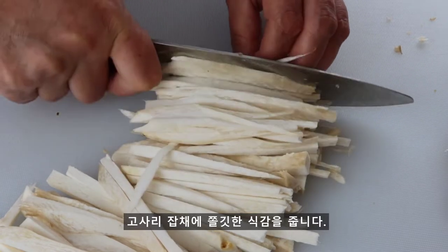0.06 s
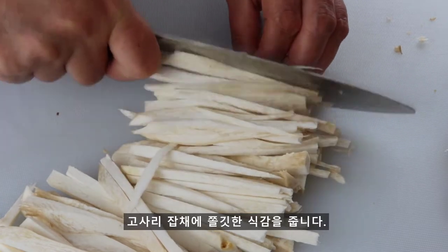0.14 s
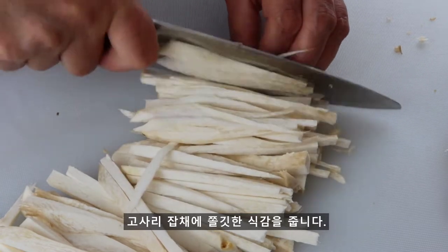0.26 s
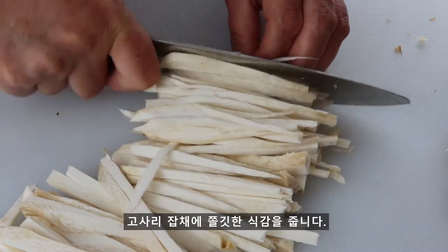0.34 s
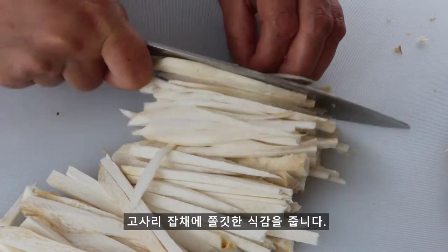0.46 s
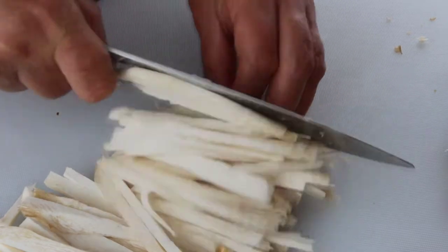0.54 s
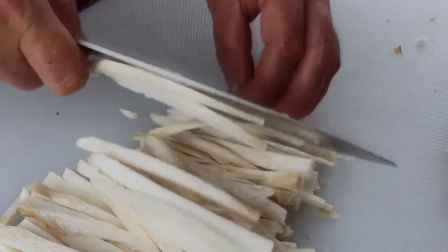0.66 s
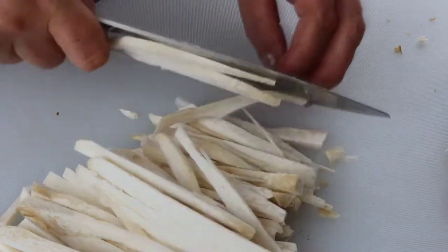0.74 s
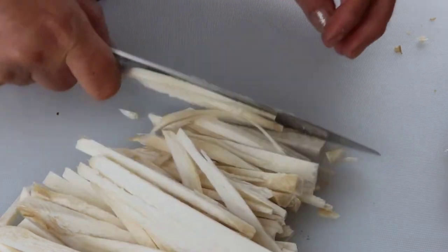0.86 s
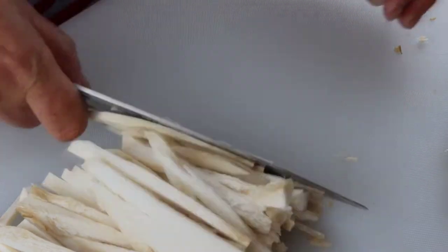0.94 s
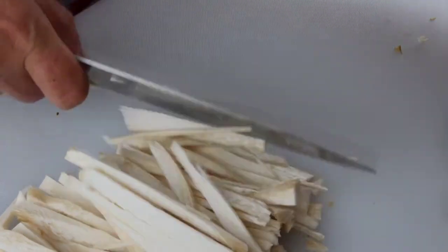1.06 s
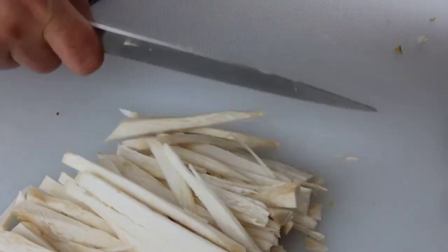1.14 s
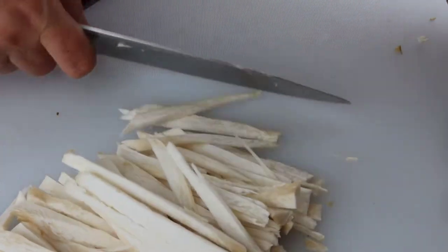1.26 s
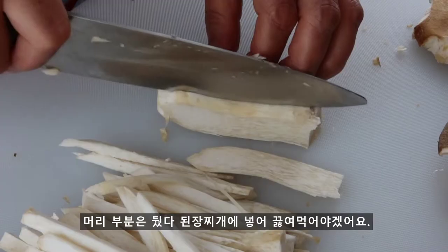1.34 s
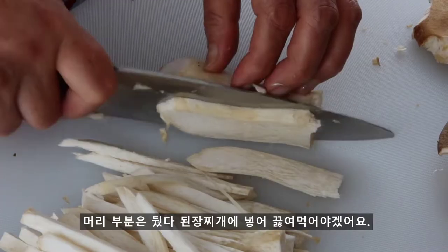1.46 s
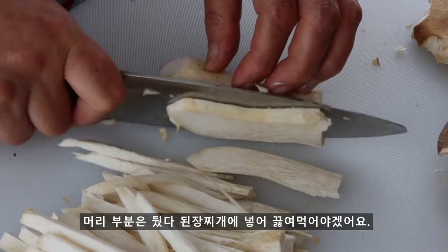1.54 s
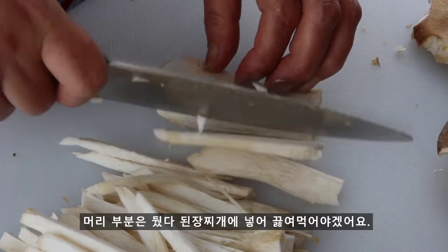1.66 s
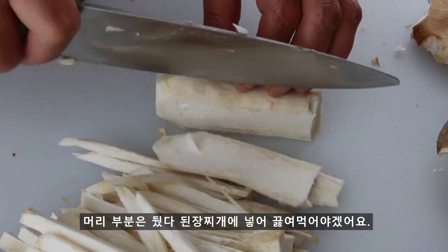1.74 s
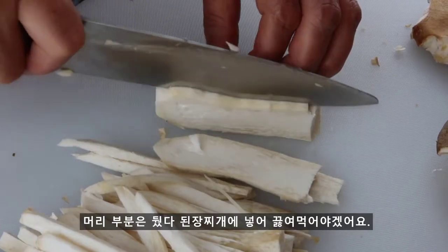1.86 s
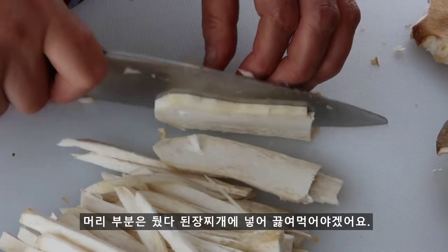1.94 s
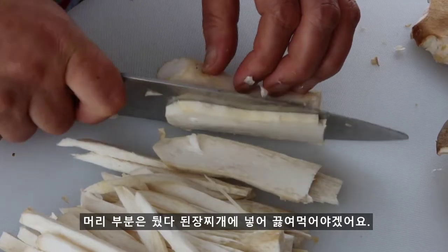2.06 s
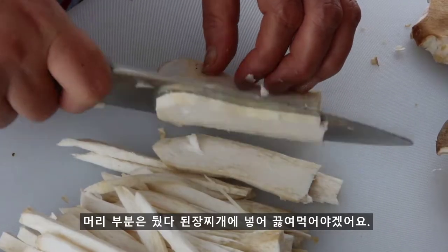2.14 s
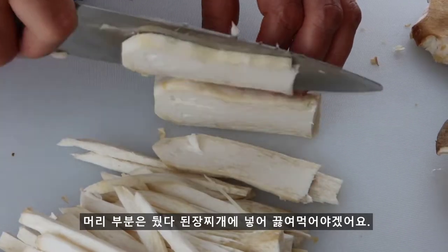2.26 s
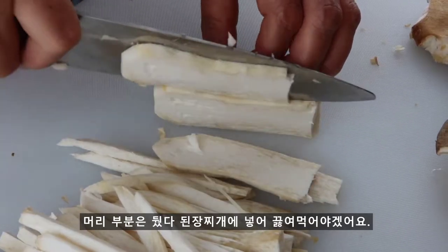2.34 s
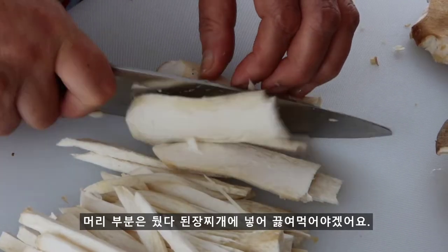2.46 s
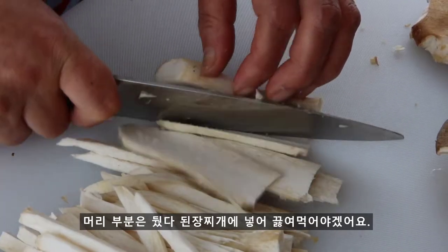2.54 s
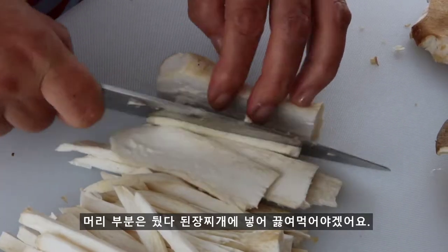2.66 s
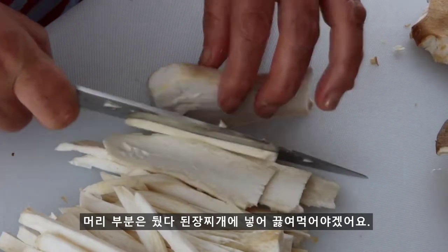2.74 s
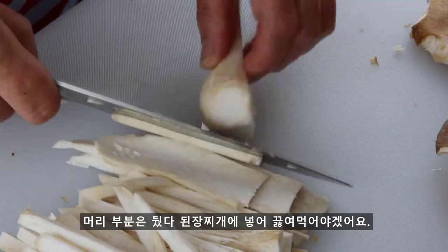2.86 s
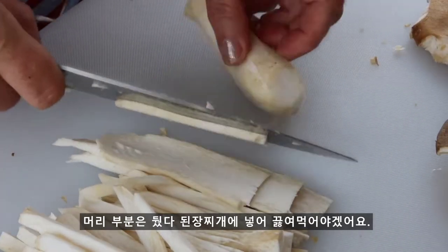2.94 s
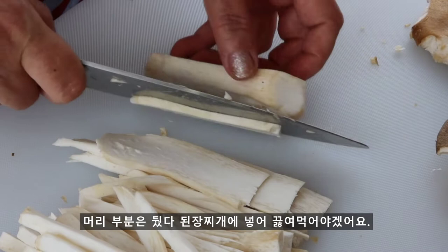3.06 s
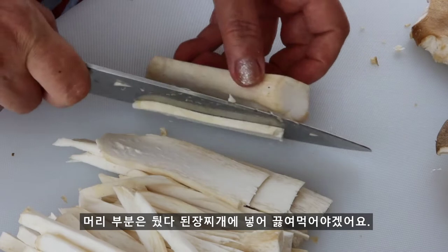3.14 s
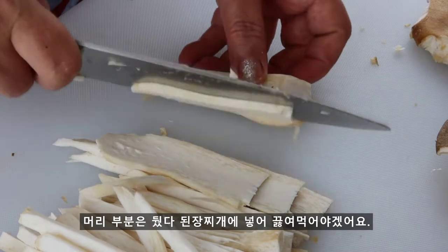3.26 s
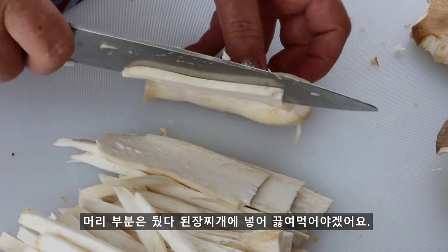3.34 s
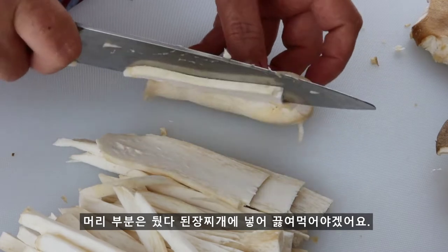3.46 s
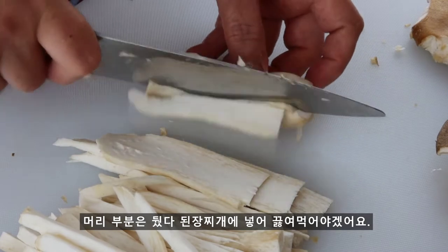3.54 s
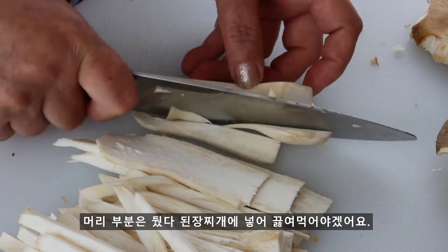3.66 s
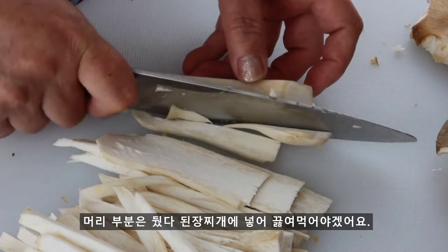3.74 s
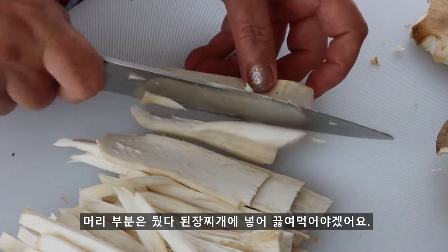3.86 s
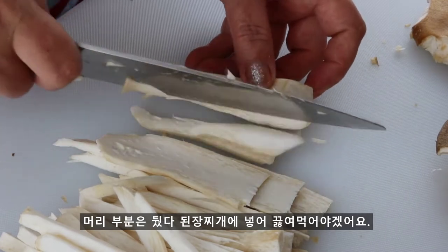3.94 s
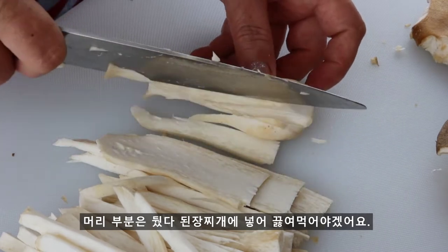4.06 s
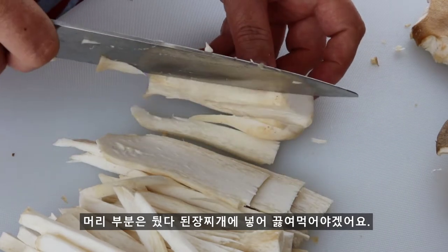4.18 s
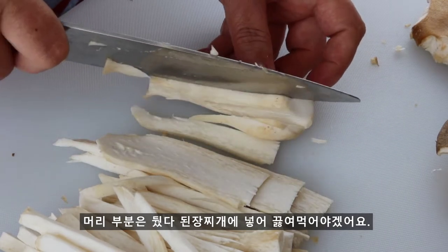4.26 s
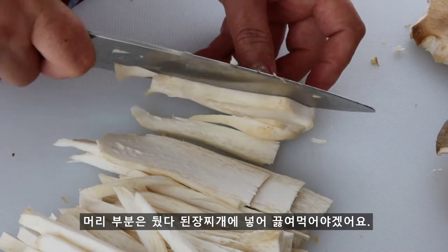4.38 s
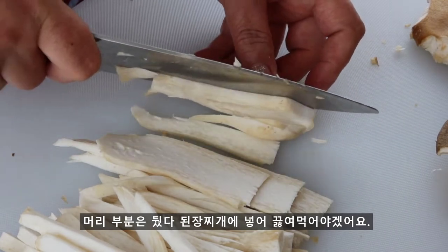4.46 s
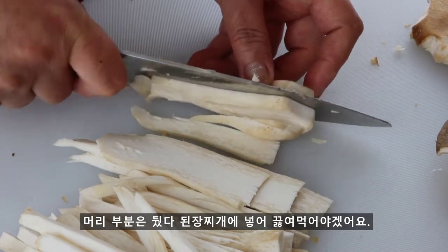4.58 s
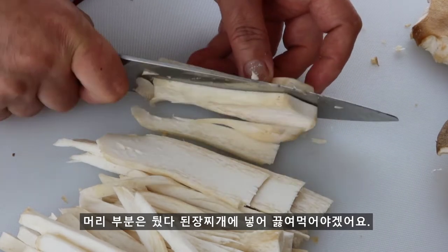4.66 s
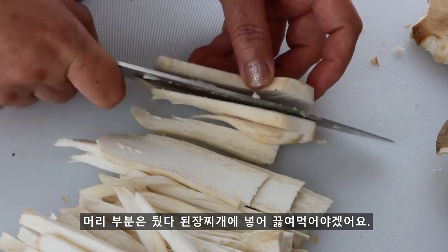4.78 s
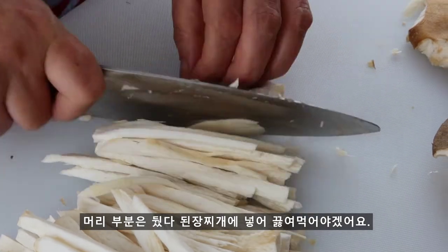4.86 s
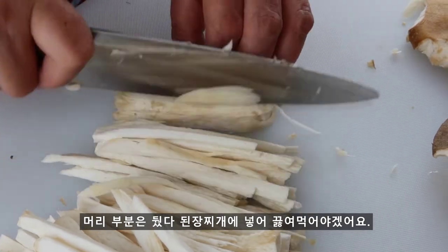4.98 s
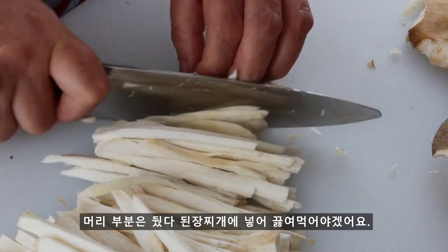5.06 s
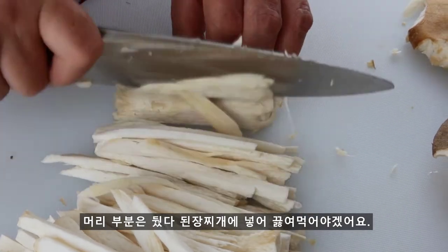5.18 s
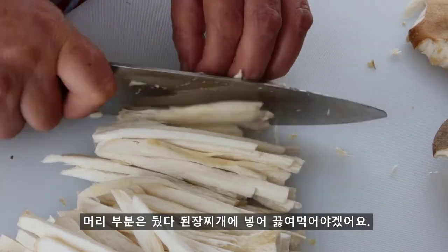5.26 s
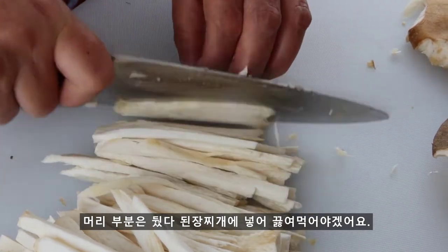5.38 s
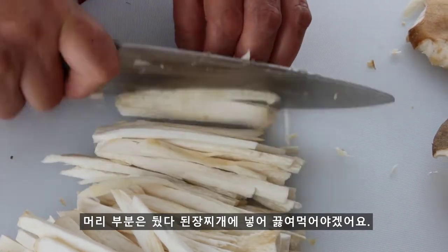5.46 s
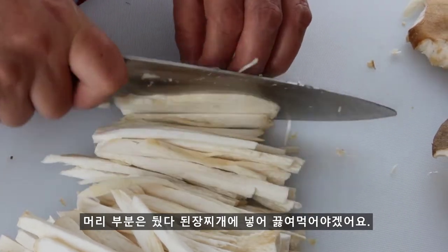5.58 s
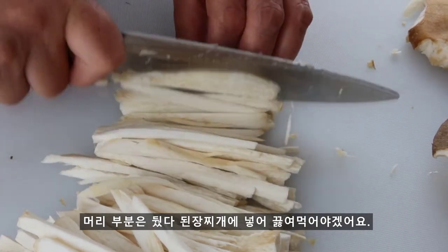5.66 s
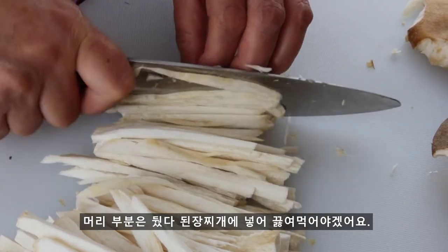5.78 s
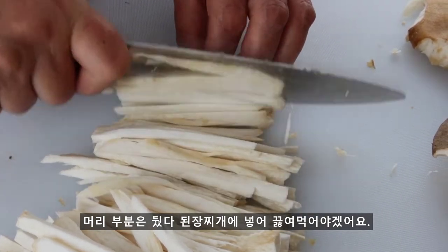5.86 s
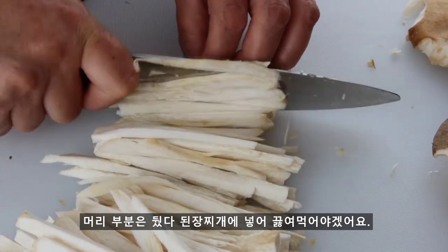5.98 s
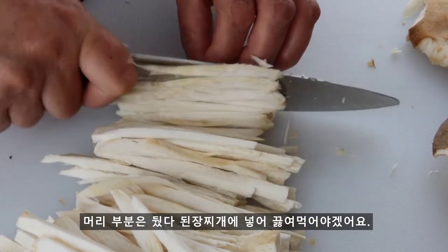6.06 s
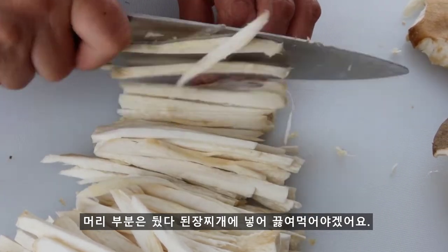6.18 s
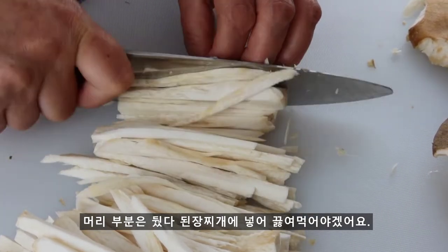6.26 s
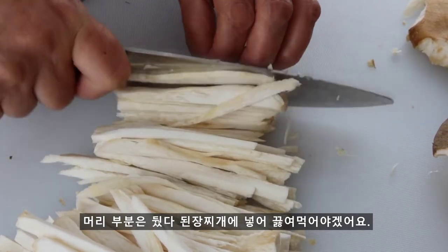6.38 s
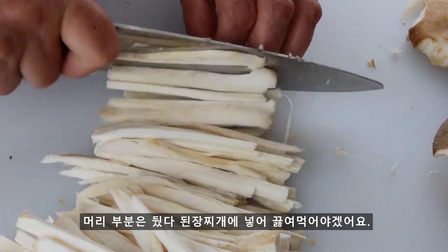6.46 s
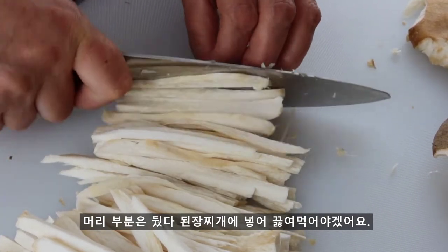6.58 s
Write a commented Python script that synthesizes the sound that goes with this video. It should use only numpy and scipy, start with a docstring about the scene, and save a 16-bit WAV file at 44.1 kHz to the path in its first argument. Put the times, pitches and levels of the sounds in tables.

```python
"""A chef's knife slices mushroom stems on a plastic board, close to the microphones in a small kitchen.
Five strokes open at an uneven pace: the edge knocks on the board and judders, mostly after a crackle of fibres.
Two hard, far brighter knocks follow between 2.5 and 4 s, with drags, soft bumps and a thin singing of the blade.
From 4.7 s the strokes come quicker; scrapes, taps and rustling slices are scattered among them throughout.
Modes ring for board and blade, random slips drive them; short echoes and soft hiss lie behind, peaks flatten."""
import sys
import numpy as np
from scipy import signal
from scipy.fft import rfft, irfft, next_fast_len
from scipy.io import wavfile

SR = 44100
rng = np.random.default_rng(int(sys.argv[2]) if len(sys.argv) > 2 else 0)


def int16_out(signal):
    """Quantize to a 16-bit WAV file."""
    q = np.round(np.clip(np.atleast_2d(signal).T, -1, 1) * 32767)
    wavfile.write(sys.argv[1], SR, q.astype(np.int16))


N = 291501  # samples


def undb(db):
    """Decibels to gain."""
    return 10 ** (np.asarray(db) / 20)


def level(x, db):
    """Scale to an rms level."""
    return x * undb(db) / np.sqrt(np.mean(x ** 2))


def burst(x, length, db):
    """Scale a burst so that its energy, spread over the given length, has this rms level."""
    return x * undb(db) * np.sqrt(length * SR / np.sum(x ** 2))


def add(track, s, x):
    """Mix a sound in at a time in seconds."""
    i = max(int(s * SR), 0)
    track[i:i + len(x)] += x[:N - i]


def along(points, hz):
    """Read (Hz, value) points on a log-frequency axis."""
    f, value = np.transpose(points)
    return np.interp(np.log(np.maximum(hz, 1)), np.log(f), value)


def colour(x, points):
    """Filter a sound by a curve of (Hz, dB) points."""
    size = next_fast_len(len(x) + 512)
    gain = undb(along(points, np.fft.rfftfreq(size, 1 / SR)))
    return irfft(rfft(x, size) * gain, size)[:len(x)]


def decay(t, t60):
    """Exponential fall by 60 dB in t60 seconds."""
    return np.exp(-np.log(1000) * t / t60)


def soften(x, hz):
    """A yielding contact takes the treble off: three equal smoothing poles."""
    pole = np.exp(-2 * np.pi * hz / SR)
    return signal.lfilter([(1 - pole) ** 3], np.poly([pole, pole, pole]), x)


def ring(modes, change_db=0, detune=0, hold=1, in_step_hz=1300):
    """Modes after one push: low ones start in step, high ones and the exact pitch depend on where it lands."""
    hz, db, t60 = np.transpose(modes)
    pitch, phase = rng.standard_normal((len(hz), 2)).T
    t = np.arange(int(np.max(t60 * hold) * SR))[:, None] / SR
    waves = np.cos(2 * np.pi * hz * (1 + detune * pitch) * t + phase * (hz / in_step_hz) ** 2)
    return (waves * decay(t, t60 * hold)) @ undb(db + change_db)


def slips(length, rate, spread_db, fade_s=0.00088):
    """A burst of tiny pushes, uneven in size and either sign, at random moments."""
    size = max(int(length * SR), 16)
    push = np.zeros(size)
    own_rng = np.random.default_rng(rng.integers(2 ** 31))
    moment, strength, sign = own_rng.random((int(length * rate) + 2, 3)).T
    # a few pushes are much stronger than the rest
    sizes = undb(-abs(spread_db) * np.log(.02 + strength)) * np.sign(sign - .5)
    np.add.at(push, (moment * size).astype(int), sizes)
    return push * signal.windows.tukey(size + 2, min(2 * fade_s / length, 1))[1:-1]


# strokes: the edge lands on the board, mostly at the end of a cut, twice with next to none:
# (landing t/s, level/dB over 10 ms, contact hardness f/Hz, edge tick level/dB re landing before colouring,
# cut length t/s, tearing level/dB, judder level/dB re landing)
STROKES = [ (0.105, -20.5, 1087, -32, 0.018, -55, -3), (.4220, -18.5, 1057, -13, 0.019, -55, -28),
           (.969, -23, 1510, -6.5, 0.0035, -60, -15), (1.6022, -12.5, 980, -16, 0.1, -53.5, -17),
           (2.1059, -18, 900, -5.5, .1, -52.5, -9), (2.5650, -5.5, 6695, 2.5, .017, -36.5, -38.5),
           (3.7242, -5, 2320, -9.5, 0.0244, -37, -22), (4.697, -16, 762, -20.5, 0.085, -48, -11.5),
           (4.9045, -22.5, 1050, -6, 0.0066, -60, 0), (5.1713, -8.5, 2100, -18.5, .035, -43.5, -28),
           (5.4060, -15, 1350, -18, .053, -45, -12.5), (5.649, -21.5, 444, -27, 0.063, -45.5, -16),
           (5.863, -9, 1220, -18.5, 0.057, -46, -18.5), (6.1071, -8, 1990, -24.5, 0.0379, -43, -26),
           (6.366, -8.5, 1670, -32, 0.024, -43, -18)]
# the mushroom bumps the board under hand or blade: (t/s, level/dB over 10 ms, contact hardness f/Hz)
BUMPS = [(1.724, -33.5, 172), (2.0594, -32.5, 1200), (3.268, -35, 220), (3.6295, -28.5, 770),
         (4.670, -32, 1206)]


def landings(firm_db=-16.5, bump_thump_db=-9, bump_tick_db=-35, bump_room_db=-5.5):
    """Every blow: (s, dB, hardness Hz, thump dB, tick dB, room dB); softer strokes thump and echo more for their level."""
    for s, db, hard_hz, tick_db, *_ in STROKES:
        force_db = db - firm_db
        yield s, db, hard_hz, 2 - 0.29 * force_db, tick_db, -6.5 - 0.31 * force_db
    for s, db, hard_hz in BUMPS:
        yield s, db, hard_hz, bump_thump_db, bump_tick_db, bump_room_db


# clear modes of the board on its worktop: (f/Hz, relative level/dB, t60 t/s before damping)
BOARD = [ (83, -15.5, 0.05), (202.6, -4.5, 0.091), (294.3, -12, 0.158), (364.4, -7.5, 0.1),
         (427.5, -2, 0.063), (531, 1.5, 0.0484), (606.9, 8.5, 0.034), (702, 7.5, 0.038), (840, 7, 0.05),
         (935, 11, 0.025), (1015, -9, 0.01), (1132, -3, 0.094), (1226, 0.5, 0.032), (1372, -9.5, 0.013),
         (1666, 1.5, 0.043), (1828, -1.5, 0.046), (2061, 5, 0.01385), (2330, -0.5, 0.017),
         (2978, -1.5, 0.027), (3704, -57, 0.011), (4700, -25, 0.0063)]
# spectrum of the board's many overlapping modes: (f/Hz, relative level/dB)
DENSE = [(300, -9.5), (1000, 1), (1600, 6), (2500, 3.5), (3800, -8), (5500, -14), (12000, -23)]


def plate(change_db=0, detune=0.022, hold=1, spread_s=0.00056, leak_hz=85, dense_db=-2, dense_t60=0.026):
    """The struck board: clear modes amid overlapping ones; bending waves take a moment to spread, deep bass leaks away."""
    clear = ring(BOARD, change_db, detune, hold)
    t = np.arange(len(clear)) / SR
    dense = colour(rng.standard_normal(len(t)), DENSE) * decay(t, dense_t60 * hold)
    match = np.sqrt(np.sum(clear ** 2) / np.sum(dense ** 2)) / 2
    board = (clear + undb(dense_db) * match * dense) * (1 - np.exp(-t / spread_s))
    return signal.sosfilt(signal.butter(2, leak_hz, "high", fs=SR, output="sos"), board)


# spectrum of the snapping fibres, lent to the edge tick as well: (f/Hz, gain/dB)
FIBRE = [(200, -4.5), (800, 12), (2000, 7.5), (3800, 1.5), (6000, -10), (10000, -15.5), (14000, -26),
         (16000, -26.5)]


def knocks(scatter_db=4.0, thump_hz=330, tick_s=0.0016, echo_hardness=0.9, tick_room_db=-16):
    """Each blow rings board and room a little differently; the edge adds a tick. Rows: near, room mid, room side."""
    out = np.zeros((3, N))
    low_modes = 1 / (1 + (np.array(BOARD)[:, 0] / thump_hz) ** 4)
    for s, db, hard_hz, thump_db, tick_db, room_db in landings():
        board = plate(thump_db * low_modes + scatter_db * rng.standard_normal(len(BOARD)))
        blow = burst(soften(board, hard_hz), .01, db)
        t = np.arange(len(blow)) / SR
        tick = undb(db + tick_db) * colour(rng.standard_normal(len(t)), FIBRE) * np.exp(-t / tick_s)
        # the thump stays close to the board; the walls receive a blend from all its sides
        all_sides = soften(plate(detune=.04, hold=.5), hard_hz * echo_hardness)
        radiated = burst(all_sides, .01, db + room_db)
        add(radiated, 0, undb(tick_room_db) * tick[:len(radiated)])
        for track, sound in zip(out, (blow + tick, *kitchen(radiated))):
            add(track, s, sound)
    return out


# the edge is dragged along the board: (start t/s, length t/s, level/dB, contact hardness f/Hz)
DRAGS = [(2.61, 0.045, -23.5, 2700), (2.778, .12, -39, 258), (4.494, .175, -42.5, 1460),
         (4.821, 0.032, -35, 2110)]


def judders(settle_delay_s=.003027, settle_s=.028, fade_share=0.22):
    """The edge sticks and slips after landings and in drags; its pressure damps and detunes the board."""
    out = np.zeros(N)
    settling = [(s + settle_delay_s, settle_s, db + settle_db, hard_hz)
                for s, db, hard_hz, *_, settle_db in STROKES]
    for s, length, db, hard_hz in settling + DRAGS:
        push = slips(length, rate=1200, spread_db=1.5, fade_s=fade_share * length)
        board = plate(detune=0.04, hold=0.37)
        add(out, s, burst(soften(signal.fftconvolve(push, board), hard_hz), length, db))
    return out


# loose slices brush each other: (start t/s, length t/s, level/dB)
RUSTLES = [(0.577, .14, -54.5), (2.941, .036, -52), (6.552, .02, -53.5)]


def cuts(dull_hz=750, swell_db=8, overlap_s=.003, cut_dull_db=5, rustle_dull_db=-10, fade_share=.12):
    """Fibres snap ever harder, crackling in the air and, dulled by flesh, through the board; slices rustle alike."""
    out = np.zeros(N)
    # the last fibres part just after the landing
    tearing = [(s - cut_s, cut_s + overlap_s, cut_db, cut_dull_db)
               for s, *_, cut_s, cut_db, _ in STROKES if cut_s > 0]
    rustling = [(*row, rustle_dull_db) for row in RUSTLES]
    for s, length, db, dull_db in tearing + rustling:
        snaps = slips(length, rate=4000, spread_db=3.5, fade_s=fade_share * length)
        snaps = snaps * undb(np.linspace(0, swell_db, len(snaps)))
        board = plate(detune=0.051, hold=0.4)
        add(out, s, burst(colour(snaps, FIBRE), length, db))
        through_board = soften(signal.fftconvolve(snaps, board), dull_hz)
        add(out, s, burst(through_board, length, db + dull_db))
    return out


# the steel scrapes or taps: (start t/s, length t/s, level/dB, board rumble level/dB re scrape,
# brightness/dB per octave, ring time factor, rise or fall of pressure level/dB)
SCRAPES = [(0.977, .062, -32.5, 0.5, 1, 0.69, 10.5), (1.718, 0.023, -45.5, 9.5, 0, 0.44, 3),
           (1.8371, 0.0026, -37.5, -1, -5.5, 0.42, -14), (2.768, .09, -46, 8, -2.5, 0.94, -5),
           (4.246, 0.007, -51.5, -20, 0, .3, -7), (5.745, .011, -37, -4, -2.5, 0.34, -5)]
# modes of the blade, damped by hand and mushroom: (f/Hz, relative level/dB, t60 t/s before the ring time factor)
BLADE = [(930, 6, 0.024), (1270, 1.5, 0.049), (1675, 4.5, 0.066), (2086, -10, 0.017), (2340, -4, 0.04),
         (3132, -33.5, .02), (3764, -0.5, 0.063), (4520, -5.5, 0.05), (5896, -19, 0.09), (6790, -10, .02),
         (7680, -10.5, 0.06), (9100, -6.5, 0.04), (10400, -34, .025)]
# spectrum of steel on plastic: (f/Hz, relative level/dB)
RASP = [(100, -20), (400, 11), (1500, 18.5), (3300, 6), (5500, -6.5), (10000, -13), (15000, -38)]


def scrapes(rumble_hz=400, grit_db=2, edge_hz=14000, peak_share=0.83, release_db=-9):
    """Steel dragged over the board: slips rumble in the board and, following the pressure, ring the blade and rasp."""
    out = np.zeros(N)
    octaves = np.log2(np.array(BLADE)[:, 0] / BLADE[0][0])
    for s, length, db, rumble_db, bright_db, hold, swell_db in SCRAPES:
        push = slips(length, rate=4500, spread_db=1.0, fade_s=0.00036)
        # the pressure moves to its turning point late in a scrape, then lets go
        pressure_db = np.interp(np.linspace(0, 1, len(push)), [0, peak_share, 1],
                                [0, swell_db, swell_db + release_db])
        bite = push * undb(pressure_db)
        blade = soften(ring(BLADE, bright_db * octaves, detune=0.01, hold=hold), edge_hz)
        rasp = colour(bite, [(hz, grit + bright_db * np.log2(hz)) for hz, grit in RASP])
        rumble = soften(signal.fftconvolve(push, plate(detune=0.037, hold=0.39)), rumble_hz)
        add(out, s, burst(signal.fftconvolve(bite, blade), length, db))
        add(out, s, burst(rasp, length, db + grit_db))
        add(out, s, burst(rumble, length, db + rumble_db))
    return out


def sing(s=2.772, length=0.14, hz=5689, db=-57, fade_s=0.065):
    """Wiped along a slice, the free blade sings thinly and fades: slips drive a single mode."""
    out = np.zeros(N)
    tone = signal.fftconvolve(slips(length, rate=2000, spread_db=1), ring([(hz, 0, .12)]))
    fade = np.exp(-np.arange(len(tone)) / SR / fade_s)
    add(out, s, burst(tone * fade, length, db))
    return out


# spectrum of the echoes off the walls: (f/Hz, relative level/dB)
WALLS = [(60, -20.5), (150, -4), (280, 2), (520, -2.5), (850, 0), (1500, -1.5), (2500, -3), (5000, -3),
         (12000, -0.5)]
# decay of the echoes by frequency: (f/Hz, t60 t/s)
ROOM_T60 = [(100, 0.41), (300, 0.29), (800, .25), (2000, 0.24), (5000, 0.235), (12000, 0.11)]
# standing waves of the kitchen: (f/Hz, relative level/dB)
STANDING = [(237, 6.5), (301, -1), (452, -0.5), (482, -10.5), (541, -6), (568, -3.5), (627, -6),
            (700, -3.5), (786, 2), (845, -3.8), (1017, -11), (1227, -9)]


def echoes(build_s=0.017, standing_t60=0.29, standing_db=-24):
    """Dense echoes and a few standing waves, of unit energy: they build up, then die away fastest in the treble."""
    t = np.arange(SR // 2) / SR
    noise, hz = rfft(rng.standard_normal(len(t))), np.fft.rfftfreq(len(t), 1 / SR)
    band_hz = np.array(ROOM_T60)[:, 0]
    tail = 0
    # overlapping bands, each with its own decay
    for share, (_, t60) in zip(np.eye(len(ROOM_T60)), ROOM_T60):
        band = along(np.c_[band_hz, share], hz)
        tail = tail + irfft(noise * band, len(t)) * decay(t, t60)
    waves = sum(undb(db) * np.cos(2 * np.pi * (f * t + rng.random())) for f, db in STANDING)
    standing = undb(standing_db) * waves * decay(t, standing_t60)
    tail = (colour(tail, WALLS) + standing) * (1 - np.exp(-(t / build_s) ** 2))
    return tail / np.sqrt(np.sum(tail ** 2))


def kitchen(x, echo_db=-6):
    """The room answers with separate random echoes for mid and side."""
    return [undb(echo_db) * signal.fftconvolve(x, echoes()) for _ in range(2)]


# spectrum of the room's rumble and hiss: (f/Hz, relative level/dB)
AIR = [(12, -63), (20, -11), (74, 1), (130, -6.5), (168, 3.5), (198, -2.5), (293, -5), (367, -9), (434, -9),
       (513, -14), (825, -14.5), (1610, -20), (2530, -21.5), (5850, -29.5), (16000, -47.5)]
# side of that noise against its mid: (f/Hz, level/dB)
AIR_SIDE = [(50, -21), (500, 0), (1500, -3), (4000, -4.5), (12000, -3.5)]
# course of the noise: (t/s, mid level/dB)
AIR_LEVEL = [(0, -48), (4.5, -48.5), (5.1, -50.5)]


def air():
    """Coloured noise for room rumble and hiss as mid and side, easing slightly in level late on."""
    gain = undb(np.interp(np.arange(N) / SR, *np.transpose(AIR_LEVEL)))
    mid, side = (level(colour(rng.standard_normal(N), AIR), 0) for _ in range(2))
    return gain * mid, gain * colour(side, AIR_SIDE)


# stereo width of knife, board and echoes: (f/Hz, side gain level/dB)
WIDTH = [(100, -31), (600, -20.5), (1100, -18), (2200, -11), (5000, -2.5), (12000, 2)]


def scene(pan_db=-0.0951, small_room_db=-6, scrape_room_db=-14, scatter_db=-3):
    """Knife, board and room in front of a close stereo pair, summed as mid and side."""
    near, knock_mid, knock_side = knocks()
    small = judders() + cuts()
    steel = scrapes() + sing()
    near = near + small + steel
    room_mid, room_side = kitchen(undb(small_room_db) * small + undb(scrape_room_db) * steel)
    air_mid, air_side = air()
    mid = near + knock_mid + room_mid[:N] + air_mid
    # hands and worktop scatter short waves unequally to the two microphones
    paths = rng.standard_normal(128) * np.hanning(128)
    scattered = undb(scatter_db) * signal.fftconvolve(near, paths / np.linalg.norm(paths))[:N]
    side = colour(scattered + knock_side + room_side[:N], WIDTH) + air_side
    return np.array([(mid + side) * undb(pan_db / 2), (mid - side) * undb(-pan_db / 2)])


def record(dry, ceiling=1.0, top_hz=15700):
    """The recorder smoothly flattens the hardest peaks, then cuts the top steeply."""
    clipped = dry / (1 + (dry / ceiling) ** 8) ** (1 / 8)
    return signal.sosfilt(signal.ellip(10, .2, 80, top_hz, fs=SR, output="sos"), clipped)


dry = scene()
out = record(dry)
int16_out(out)
```